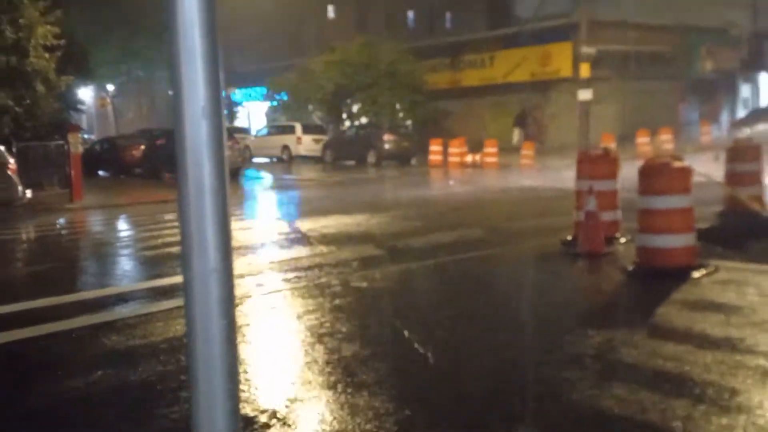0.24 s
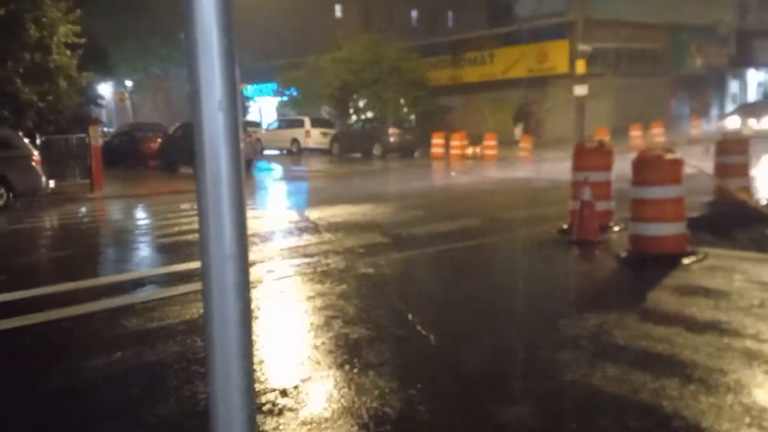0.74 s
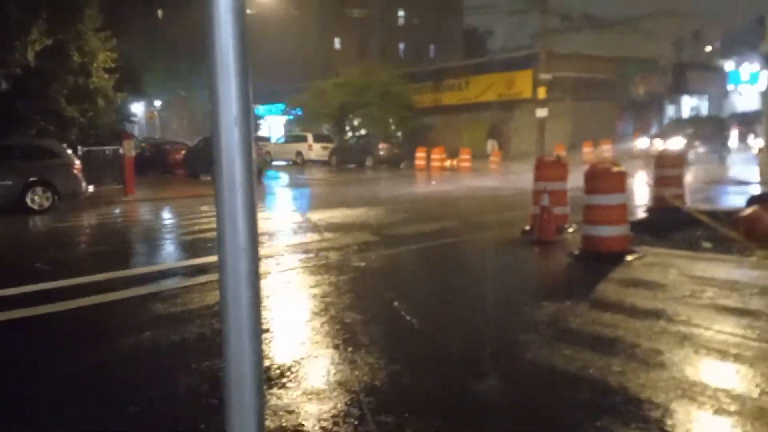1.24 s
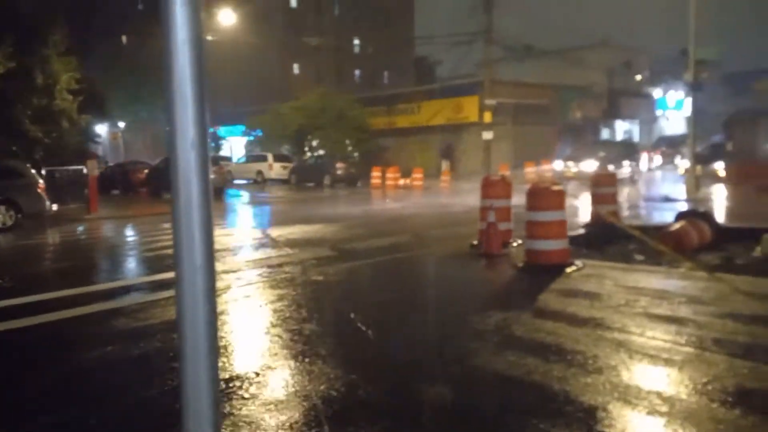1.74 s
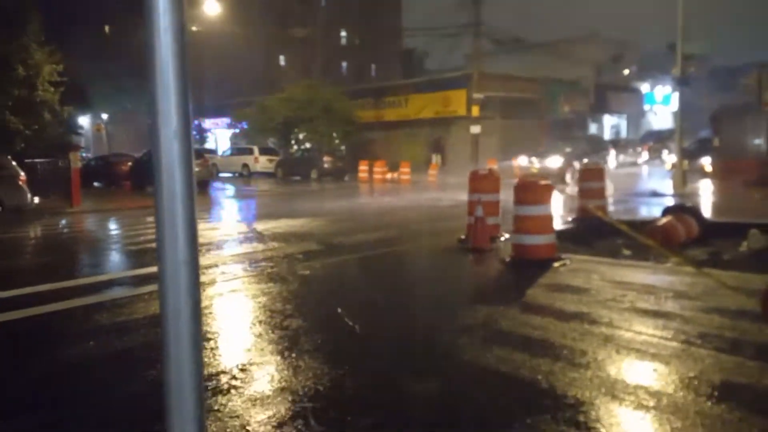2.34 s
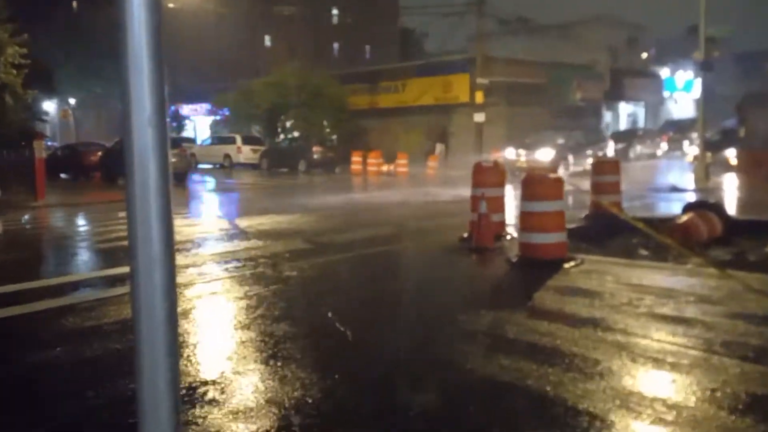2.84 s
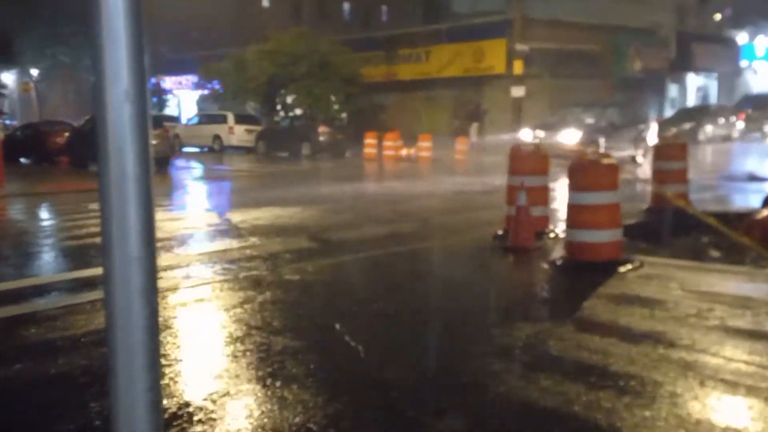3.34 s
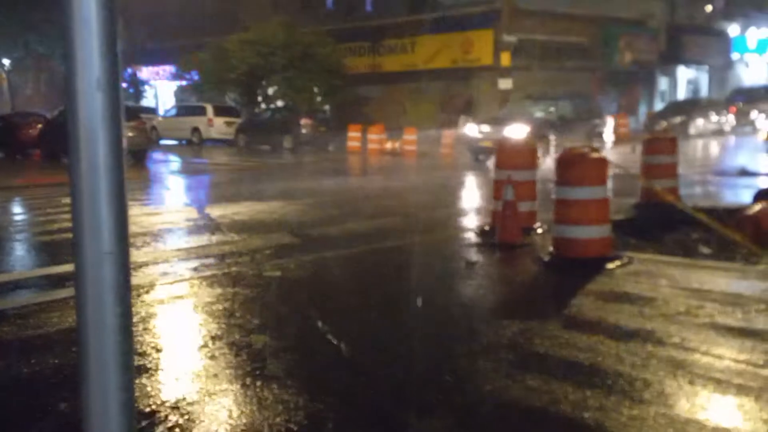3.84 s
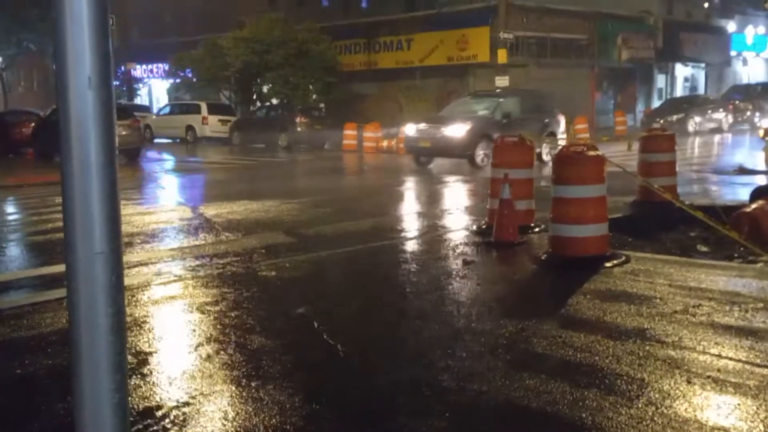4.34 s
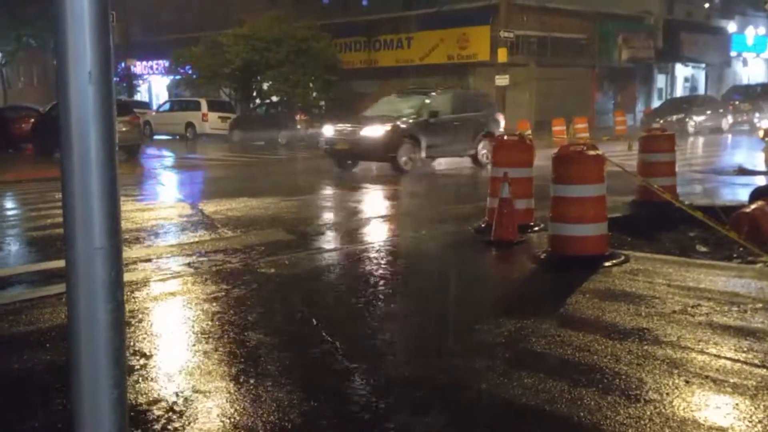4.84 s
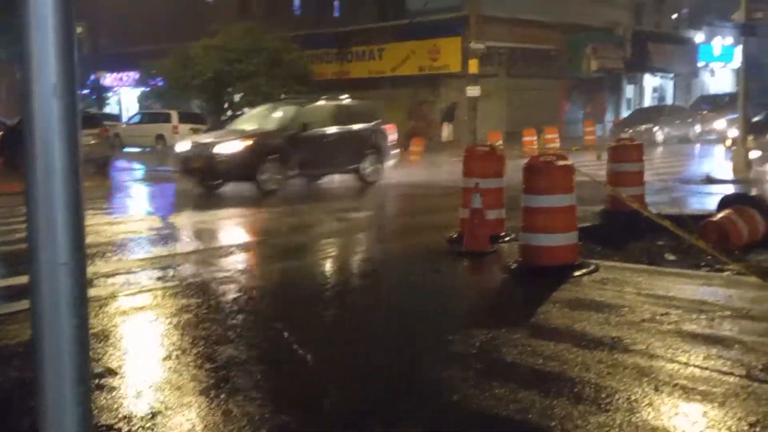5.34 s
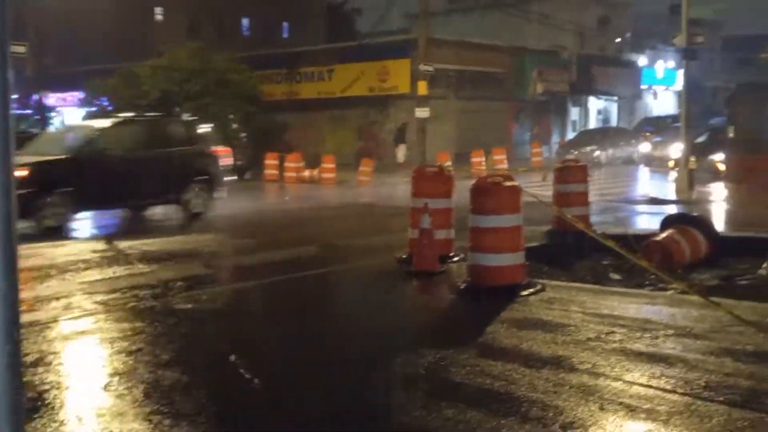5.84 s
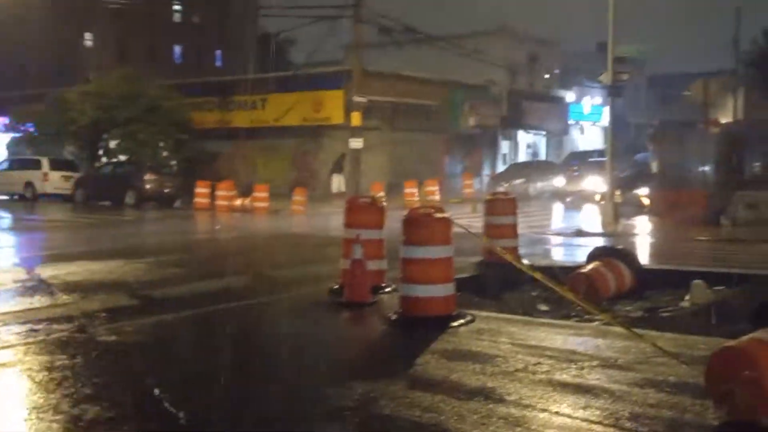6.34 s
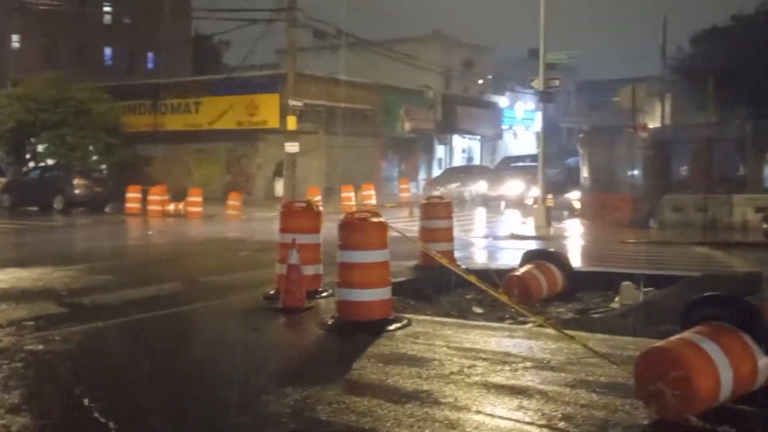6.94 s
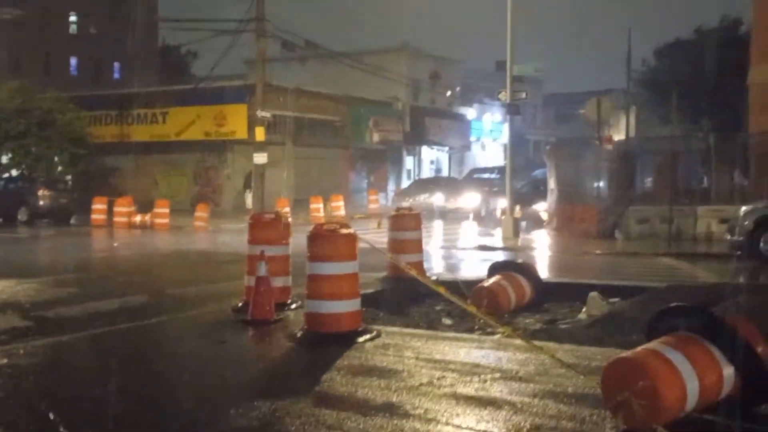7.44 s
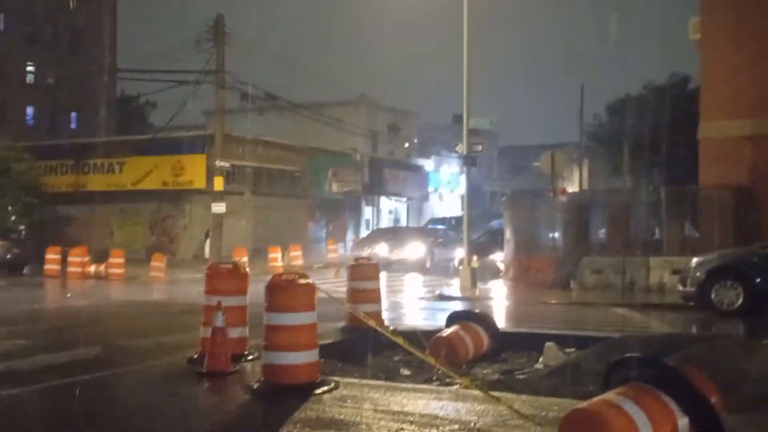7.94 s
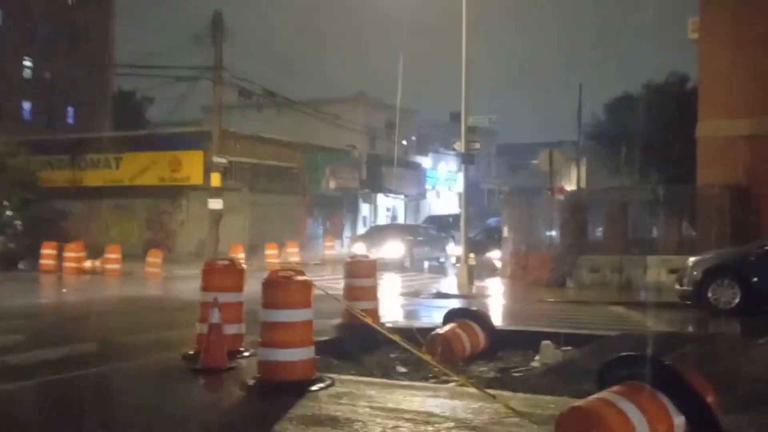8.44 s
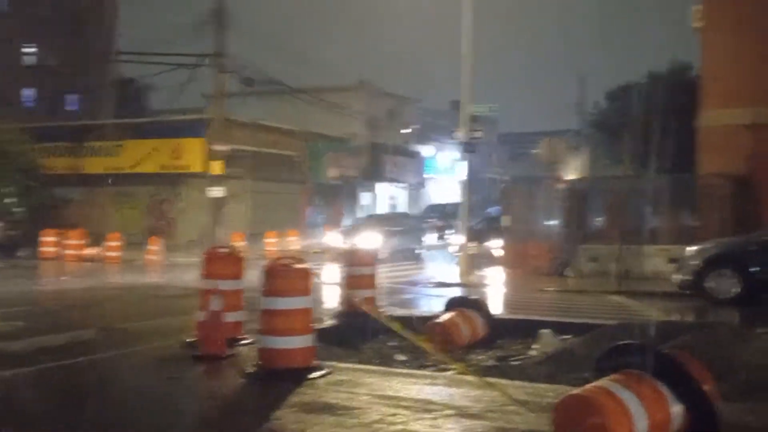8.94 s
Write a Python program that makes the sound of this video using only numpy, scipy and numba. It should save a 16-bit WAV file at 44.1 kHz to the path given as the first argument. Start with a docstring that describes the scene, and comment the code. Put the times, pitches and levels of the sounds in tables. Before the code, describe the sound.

A handheld stereo microphone under cover hears steady heavy rain all around, fine crackling drops and sharp nearby drips. Wind first pushes as a dull bass rumble, then breaks into short fluttering buffets. Far engines drone softly and a faint avenue hiss sits to the right. Midway a car sweeps by with airy road roar and splashing tyres, moving left; its wet hiss swells again near the end, with one last loud drip.

```python
"""Heavy rain on a night street, heard from under a shelter by two microphone ports 19 cm apart.
Far drops are a wash of coloured noise from all round; nearer ones are random crackles at several pitches.
Close drips are millisecond noise splats with smeared echoes off the wall. A car to the side is banded noise:
tyre spray with a moving brighter band, a lower hum and road roar. Wind on the ports is low noise, mostly
separate at each, with buffets, thumps and bass dropouts. Far behind: a noise traffic drone, an avenue's hiss."""
import sys
import numpy as np
from scipy import signal
from scipy.fft import rfft, irfft, next_fast_len
from scipy.io import wavfile
from scipy.ndimage import uniform_filter1d
from numba import njit

SR = 44100
rng = np.random.default_rng(int(sys.argv[2]) if len(sys.argv) > 2 else 0)


def persist_wave(psi):
    """Save psi, clipped to +-1, as 16-bit WAV."""
    counts = np.round(np.clip(psi, -1, 1) * 32767).astype(np.int16)
    wavfile.write(sys.argv[1], SR, np.atleast_2d(counts).T)


N = 405719
PORT_GAP_M, SOUND_M_PER_S = .19, 343


def rain():
    """Countless far drops merge into a wash whose low and high parts swell in sheets; nearer drops stay grainy."""
    # wash over time, before the early colouring: t/s, level/dB
    rain_level = [(0, -33.5), (.6, -34), (1.2, -35), (2.2, -36), (2.6, -35), (2.61, -38.5), (2.9, -37.5),
                  (3.28, -38), (3.7, -37), (4.48, -35), (4.74, -35.5), (5.0, -34.5), (5.59, -34.5),
                  (6.1, -36), (6.9, -33.5), (7.3, -34.5), (8.68, -32.5), (9.2, -34.5)]
    # spectrum of the wash: f/Hz, density/dB per Hz
    rain_colour = [(300, -13), (700, -9), (1500, -1.5), (2500, -0.5), (5000, -3.5), (8000, -5),
                   (16000, -10)]
    # nearer drops landing on different things: f/Hz, rate/drops per s, level against the wash/dB
    patter_bands = [(1580, 60, -18), (2560, 70, -14.5), (3960, 70, -13), (6000, 59, -12), (9200, 50, -11),
                    (14100, 50, -15)]
    # the two sides are coloured differently at first, then abruptly alike: f/Hz, left/dB, right/dB
    early_colour = [(600, 1, 5.5), (1560, 0.5, 2), (2860, -2.5, 4), (3850, 1.5, 4), (4800, 1, 2.5),
                    (6740, -2, 4), (9900, 0.5, 3.5), (14000, -1, 4.5)]
    early_ends_s = 2.603
    wash = unit(colour(all_round(), rain_colour))
    dull = signal.sosfilt(signal.butter(1, 5000, fs=SR, output="sos"), wash)
    bright = wash - dull
    sheets_db = 0.34 * walk(11)  # swells shared by both parts
    wash = dull * undb(sheets_db + 1.15 * walk(15)) + bright * undb(sheets_db + 1.3 * walk(18))
    near = sum(undb(db) * patter(hz, per_s) for hz, per_s, db in patter_bands)
    late = wash + near + undb(-2.0) * wall(near)
    early = np.array([colour(late[0], early_colour, column=1), colour(late[1], early_colour, column=2)])
    shower = np.where(np.arange(N) < early_ends_s * SR, early, late)
    return shower * undb(curves(rain_level)[0])


def patter(hz, per_s, scatter_db=5.0):
    """Drops at random moments and sides, a few much larger; each a short crackle around its pitch."""
    sizes_db = scatter_db * np.minimum(rng.exponential(size=N), 2.4)
    drops = (rng.random(N) < per_s / SR) * undb(sizes_db)
    sides = drops * pan(rng.normal(0, 5.6, N))
    decay_s = 0.0045
    envelope = signal.lfilter([1], [1, -np.exp(-1 / (decay_s * SR))], sides)
    crackle = envelope * rng.standard_normal((2, N))
    band = signal.butter(2, [0.62 * hz, min(1.21 * hz, 20000)], "bandpass", fs=SR, output="sos")
    return unit(signal.sosfilt(band, crackle))


def drips():
    """Each drip: a broad crack of impact, a millisecond splat with a fine fizz; the wall returns all but the fizz."""
    # close drips: t/s, level over 1 ms of the stronger part at the louder port/dB,
    # left minus right/dB, splat f/Hz, fizz minus splat/dB
    drip_hits = [(0.211, -21.5, -2, 5700, 1), (0.479, -18.5, -2, 3270, -13.0), (0.5776, -22, 8.0, 5200, 6),
                 (0.61, -19, 6, 5600, 0), (0.652, -21.5, 6, 5460, -18), (0.695, -23, 1, 5600, -1),
                 (0.8356, -14.5, 4, 3120, -7), (0.847, -23, -9, 3300, -14), (0.876, -17.5, -11, 3950, -4),
                 (0.907, -29, 2, 6000, 7), (0.9434, -33, 7, 5000, -1), (0.996, -22, -7, 7400, -10),
                 (1.1442, -23, 2, 5500, 14), (1.28, -24, 5.0, 5700, -13), (1.6981, -30, -2, 4600, -7.0),
                 (1.877, -20, -5, 5900, 16), (1.9445, -20.5, 3, 4540, -7), (1.9943, -21, 7, 5200, 6),
                 (2.0966, -26, 8.0, 5800, 4.0), (2.186, -22, -4, 4300, -14), (2.325, -27, 0, 6000, 12),
                 (2.3416, -24, 0, 4300, 4), (2.4212, -21.5, -2, 4970, -12), (2.584, -22, 5, 4320, -9),
                 (2.663, -24, 5, 5300, 1), (2.7319, -27, 9.0, 5600, 13), (2.784, -31, 0, 5100, 10),
                 (2.9017, -26, 2, 5100, 10), (3.134, -28, 0, 5500, 10), (3.157, -25, 1, 4800, 17),
                 (3.2556, -27, 8, 5500, -2), (3.3202, -24, -1, 5300, 4), (3.557, -18, 4, 5900, -14.0),
                 (3.8967, -25, 3, 6300, -3), (4.052, -22.5, 3, 5130, -8), (4.3272, -27, 0, 6500, -10),
                 (4.3298, -23.5, 3, 5600, -6), (4.9315, -22, 0, 5200, 2), (4.9385, -22.5, -3, 5200, 6),
                 (4.966, -24, 2, 5000, -5), (5.079, -27, -1, 4900, -2), (5.3206, -22.5, 2, 4630, -14),
                 (5.6433, -18.5, 4, 4360, -14), (5.737, -20, -12, 3400, -10), (6.359, -19, -2, 4400, -14),
                 (6.987, -25, 1, 4200, -17), (7.056, -24, 3, 3950, -13), (7.3634, -25, 0.0, 5200, 12),
                 (7.595, -27, -7, 4000, -14.0), (7.7432, -24.5, 1, 5800, 0), (8.6948, -15.5, -2, 3540, -5),
                 (8.711, -23, 2.0, 4600, -2)]
    crack_db, crack_s = -0.5, .00006  # first instant of contact: level against the splat, decay
    t = np.arange(500) / SR
    fade = np.exp(-t / np.array([[[.001]], [[.0014]]]))  # decay in s: splat, fizz
    direct, splats = np.zeros((2, N + len(t))), np.zeros((2, N + len(t)))
    fizz_band = signal.butter(2, [10500, 16000], "bandpass", fs=SR, output="sos")
    crack_band = signal.butter(1, [1500, 9000], "bandpass", fs=SR, output="sos")
    for s, db, pan_db, hz, fizz_db in drip_hits:
        noise = rng.standard_normal((2, 2, len(t))) * fade
        splat_band = signal.butter(2, [0.6 * hz, min(1.4 * hz, 9000)], "bandpass", fs=SR, output="sos")
        splat = signal.sosfilt(splat_band, noise[0] + 0.18 * noise[0, ::-1])  # a little of the other port
        fizz = signal.sosfilt(fizz_band, noise[1])
        crack = signal.sosfilt(crack_band, np.sign(noise[0]) * np.exp(-t / crack_s))
        splat, fizz, crack = (millisecond_unit(part) for part in (splat, fizz, crack))
        splat = (splat + undb(crack_db) * crack) / np.hypot(1, undb(crack_db))
        gain = undb(db - abs(pan_db) / 2 - max(fizz_db, 0))
        i = int(s * SR)
        direct[:, i:i + len(t)] += gain * pan(pan_db)[:, None] * (splat + undb(fizz_db) * fizz)
        splats[:, i:i + len(t)] += gain * splat
    return direct[:, :N] + wall(splats)


def millisecond_unit(x):
    """Scale each port so that its whole energy equals one millisecond at rms 1."""
    return x / np.sqrt((x ** 2).sum(axis=1, keepdims=True) / (.001 * SR))


def wall(x):
    """Echoes off the wall, each more smeared than the last, stronger on the right."""
    # returns: delay/s, level before the pan/dB, smear decay/s
    wall_returns = [(.0066, -7.5, .0012), (.013, -10.5, .003), (.021, -17, .006)]
    t = np.arange(900) / SR
    echo = np.zeros((2, 2000))
    for delay, db, smear_s in wall_returns:
        smear = rng.standard_normal((2, len(t))) * np.exp(-t / smear_s)
        i = int(delay * SR)
        echo[:, i:i + len(t)] += undb(db) * smear / np.sqrt((smear ** 2).sum(axis=1, keepdims=True))
    return signal.fftconvolve(x, echo * pan(-16.5)[:, None], axes=1)[:, :N]


def car():
    """Wet tyres throw up spray that surges at puddles, and hum; the road roar takes a longer way to the right."""
    # passage: t/s, spray hiss level before surges/dB, roar level/dB, brighter spray band centre f/Hz,
    # port delay as a share of the gap's travel time (negative to the left)
    passage = [(0, -48, -47.5, 2100, 0.69), (4, -72, -54, 2100, 0.49), (5, -49, -45.5, 2100, 0.19),
               (5.3, -48, -48, 2100, -0.65), (5.45, -44.5, -41, 2100, -0.57),
               (5.8, -45, -41.5, 2160, -0.74), (6.05, -45, -45.5, 2210, -0.83),
               (6.35, -44, -41.5, 2220, -0.84), (6.7, -46.5, -46, 2220, -0.99),
               (7.1, -41, -53, 2250, -1.03), (7.25, -43, -58, 1630, -1.06), (7.4, -40, -53, 1600, -1),
               (7.92, -39.5, -45.5, 1750, -0.95), (8.0, -38, -62, 2000, -0.995),
               (8.22, -34.5, -64, 2080, -0.97), (8.5, -34.5, -62, 2140, -1.01),
               (8.8, -38.5, -60, 2160, -0.92), (9.05, -36.5, -56, 2220, -1.01),
               (9.2, -45, -59, 2190, -0.91)]
    # spectrum of the spray: f/Hz, density/dB per Hz
    tyre_colour = [(500, -31), (950, -0.5), (1250, -27), (1600, -9.5), (2500, 0), (4000, -2), (6000, -9),
                   (10000, -26)]
    # wheels hit puddles: t/s, rise of the spray/dB, duration/s
    puddle_hits = [(5.733, 13, 0.044), (5.973, 9, 0.037), (6.594, 9, 0.068), (6.694, 16, 0.091),
                   (7.08, 9, 0.06), (7.596, 11.5, 0.015), (7.997, 6.5, 0.036), (8.712, 1, .06)]
    # spectrum of the roar: f/Hz, density/dB per Hz
    roar_colour = [(350, -28), (550, 7), (760, 6), (950, 4.5), (1400, -19.5)]
    # rising hollow note in the roar: t/s, centre f/Hz
    hollow_note = [(5.4, 740), (6.4, 810), (7.1, 860)]
    # lower band of the tyres as the car draws away: t/s, level/dB, centre f/Hz
    tyre_hum = [(0, -70, 1250), (5, -68, 1250), (5.9, -47, 1280), (6.5, -49, 1280), (7.3, -54, 1220),
                (7.9, -46, 1200), (8.1, -51, 1220), (8.9, -45, 1220), (9.2, -51, 1270)]
    spray_db, roar_db, spray_band_hz, delay_share = curves(passage)
    t = np.arange(N) / SR
    surge_db = sum(db * np.exp(-((t - s) / (lasts / 2)) ** 2) for s, db, lasts in puddle_hits)
    hiss = unit(colour(rng.standard_normal(N), tyre_colour))
    spray_band = undb(1.9 * walk(22)) * moving_band(spray_band_hz * (1 + 0.03 * walk(14)), 420.0)
    spray = undb(surge_db) * hiss + undb(-5.0 + 0.59 * surge_db) * spray_band
    spray = spray * undb(spray_db + 1.0 * walk(11.0))
    hollow = moving_band(curves(hollow_note)[0] * (1 + 0.027 * walk(12)), 240.0)
    road = unit(colour(rng.standard_normal(N), roar_colour))
    roar = unit(road + undb(-4.0) * hollow) * undb(roar_db + 3.7 * walk(14))
    detour = round(0.001307 * SR)  # the right port hears the roar 1.3 ms later
    hum_db, hum_hz = curves(tyre_hum)
    hum = moving_band(hum_hz, 480.0) * undb(hum_db + 1.2 * walk(9.8))
    tyres = ports(spray, delay_share) * pan(-4)[:, None] + ports(hum, delay_share)
    return tyres + np.array([roar, np.roll(roar, detour)])


def moving_band(hz, width_hz):
    """Noise through two equal moving resonances in a row, rms 1."""
    return unit(resonance(resonance(rng.standard_normal(N), hz, width_hz), hz, width_hz))


def wind(shared=0.53):
    """Eddies press on each port mostly on its own: a choppy push and buffets; one side's bass drops out briefly."""
    # rumble of the push before chop: t/s, left level/dB, right level/dB
    wind_level = [(0, -29, -25.5), (1.2, -27.5, -26), (1.6, -27, -24), (2.5, -25.5, -25.5),
                  (2.9, -34.5, -32.5), (3.7, -31, -32), (4.5, -32, -31.5), (6.3, -30.5, -30),
                  (7, -31, -33.5), (9.2, -33.5, -31)]
    # spectrum of the rumble: f/Hz, density/dB per Hz
    wind_colour = [(20, -16.5), (45, -19), (65, -0.5), (85, 1.5), (120, -6.5), (200, -21.5), (400, -45.5)]
    # a dull push turns to brighter gusts: t/s, flutter over rumble/dB
    gust_flutter = [(0, -12), (2.5, -12), (4, -9), (5.5, -6), (7, -7), (9.2, -6.5)]
    # spectrum of the flutter: f/Hz, density/dB per Hz
    flutter_colour = [(70, -25), (130, 1), (200, -3.5), (330, -7.5), (600, -19), (1200, -41)]
    # depth of the random chop: t/s, spread/dB
    chop_depth = [(0, 1), (2.6, 1.5), (4.2, 4.5), (9.2, 5.5)]
    # strong buffets: t/s, peak level/dB, left minus right/dB
    buffet_hits = [(0.743, -25, 5), (0.958, -30.5, -18), (1.211, -26.5, -11), (1.357, -36, 15),
                   (1.686, -23, -4), (2.055, -27, 1), (2.215, -28.5, 18), (2.3, -28, -4), (2.509, -26, 1.0),
                   (2.579, -34, -8), (2.849, -24.5, 1), (3.118, -28, -5), (3.402, -26.5, 0.2),
                   (3.756, -32, 1), (4.176, -28, 3), (4.32, -25, 5), (4.421, -26, 5), (4.575, -22.5, -3),
                   (4.624, -22, 3), (4.868, -22, -2), (4.954, -26, 1), (5.03, -25, 6), (5.073, -26, 0),
                   (5.278, -26, 7), (5.33, -34, -2), (5.468, -34, 8), (5.577, -28, -3), (5.703, -17.5, 3),
                   (5.745, -27, 1), (5.79, -29, -10), (5.956, -33, -5), (6.231, -28, 3), (6.321, -26, -8),
                   (6.371, -26, 3), (6.58, -44, -0.8), (6.934, -29, -2), (7.084, -21.5, -4),
                   (7.323, -26, 3), (7.656, -22, 1), (7.907, -24, 0), (7.992, -33, 11), (8.047, -26, 0),
                   (8.186, -34, -9), (8.261, -27, 5), (8.472, -26, -3), (8.905, -28, 11), (9.099, -24, 2)]
    # buffets are long and dull in the push, short in the gusts: t/s, duration/s,
    # gain on the flutter/dB
    buffet_shape = [(0, 0.06, -14), (2.6, 0.04, -21), (3.2, 0.028, -5.5), (9.2, 0.023, -3.5)]
    # the bass on one side drops out briefly; left list, then right: centre t/s, duration/s
    bass_dropouts = [
        [(3.826, 0.073), (4.785, 0.071), (5.378, 0.019), (6.525, 0.067), (6.785, 0.13), (7.009, 0.056),
         (7.283, 0.038), (7.418, 0.019), (7.513, 0.035), (7.812, 0.037), (8.087, 0.076), (8.855, 0.09),
         (8.935, 0.03), (9.129, 0.045)],
        [(3.298, 0.044), (3.607, 0.023), (4.255, 0.022), (4.694, 0.056), (4.99, 0.062), (5.123, 0.023),
         (5.198, 0.065), (6.869, 0.043), (7.189, 0.048), (7.942, 0.072), (8.137, 0.041), (8.531, 0.051),
         (8.79, 0.046)],
    ]
    dropout_db, dropout_edge_s = -23, 0.0079
    flutter_db, chop_db = curves(gust_flutter)[0], curves(chop_depth)[0]
    lasts_s, share_db = curves(buffet_shape)
    eddies = rng.standard_normal((2, 2, N)) + shared * rng.standard_normal((2, 1, N))
    rumble = unit(colour(eddies[0], wind_colour))
    flutter = undb(flutter_db) * unit(colour(eddies[1], flutter_colour))
    push, shove = rumble + flutter, rumble + undb(share_db) * flutter
    chop = undb(chop_db * np.array([walk(36), walk(36)]))
    steady_chop = chop / uniform_filter1d(chop, SR // 8)  # leaves the slow level alone
    out = push * steady_chop * undb(curves(wind_level))
    t = np.arange(-3000, 3000)  # samples either side of a buffet's peak
    for s, db, pan_db in buffet_hits:
        i = int(s * SR)
        at = np.minimum(i + t, N - 1)
        swell = np.exp(-(t / (lasts_s[i] / 2 * SR)) ** 2)
        puff = shove[:, at] * swell
        level = np.sqrt((swell ** 2).sum() / (puff ** 2).sum(axis=1, keepdims=True))
        out[:, at] += puff * level * undb(db) * pan(pan_db)[:, None]
    gate = np.ones((2, N))
    for port, dropouts in enumerate(bass_dropouts):
        for s, lasts in dropouts:
            gate[port, int((s - lasts / 2) * SR):int((s + lasts / 2) * SR)] = undb(dropout_db)
    return out * uniform_filter1d(gate, int(dropout_edge_s * SR))


def thumps(rise_s=0.0022, fall_s=0.032):
    """Each sharp gust thumps as a brief puff of pressure around its centre, largely common to both ports."""
    # gusts: t/s, level before rise and fall/dB, centre f/Hz, left minus right/dB
    thump_hits = [(0.318, -29, 365, -4), (1.026, -40, 358, 0), (1.628, -38, 278, -12), (4.644, -33, 223, 1),
                  (6.51, -35, 288, -0.5), (7.08, -25.5, 259, -3), (8.044, -29.5, 318, -1),
                  (8.96, -40, 299, 3), (9.089, -30, 288, 4)]
    t = np.arange(4000) / SR
    envelope = np.minimum(t / rise_s, 1) * np.exp(-t / fall_s)
    out = np.zeros((2, N + len(t)))
    for s, db, hz, pan_db in thump_hits:
        noise = rng.standard_normal(len(t)) + 0.65 * rng.standard_normal((2, len(t)))
        band = signal.butter(2, [0.29 * hz, 1.5 * hz], "bandpass", fs=SR, output="sos")
        puff = unit(signal.sosfilt(band, noise))
        i = int(s * SR)
        out[:, i:i + len(t)] += puff * envelope * undb(db) * pan(pan_db)[:, None]
    return out[:, :N]


def drone():
    """Engines further off, from all round and from ahead, and the steady tyre hiss of an avenue on the right."""
    # engines: t/s, level/dB
    drone_level = [(0, -38), (2.4, -43), (4.3, -40), (5.7, -47.5), (7, -43.5), (9.2, -37.5)]
    # spectrum of the engines: f/Hz, density/dB per Hz
    drone_colour = [(100, -32), (200, -4.5), (320, 4), (500, -5.5), (720, -3), (1000, -9.5), (2000, -55)]
    # spectrum of the avenue: f/Hz, density/dB per Hz
    avenue_colour = [(250, -5), (450, 3.5), (750, -5), (1300, 1.5), (2200, -13.5), (4000, -16), (8000, -18)]
    avenue_db, avenue_bearing = -43, 0.69  # level before its wavering, sine of the bearing
    traffic = colour(all_round() + 0.9 * ports(rng.standard_normal(N), 0.3), drone_colour)
    engines = unit(traffic * undb(2.0 * walk(9.7))) * undb(curves(drone_level)[0])
    avenue = unit(colour(rng.standard_normal(N), avenue_colour)) * undb(avenue_db + 0.83 * walk(7.9))
    return engines + ports(avenue, avenue_bearing)


def all_round():
    """Noise from every direction: alike at both ports in the bass, unrelated once the gap exceeds the wavelength."""
    size = next_fast_len(N)
    hz = np.arange(size // 2 + 1) * SR / size
    alike = np.sinc(2 * hz * PORT_GAP_M / SOUND_M_PER_S)
    mid, side = rfft(rng.standard_normal((2, size)))
    mid, side = mid * np.sqrt(1 + alike), side * np.sqrt(1 - alike)
    return unit(irfft(np.array([mid + side, mid - side]), size)[:, :N])


def ports(x, delay_share):
    """Sound reaches the nearer port first, by a share of the gap's travel time (positive: right port first)."""
    lag = delay_share * PORT_GAP_M / SOUND_M_PER_S * SR / 2
    if np.ndim(lag):  # a moving source
        at = np.arange(N)
        return np.array([np.interp(at - lag, at, x), np.interp(at + lag, at, x)])
    return np.array([np.roll(x, round(lag)), np.roll(x, -round(lag))])


def pan(db):
    """Left and right gains for a level difference, left minus right."""
    return undb(np.array([db, -db]) / 2)


@njit
def resonance(x, hz, width):
    """State-variable band-pass whose centre moves; gain 1 at the centre."""
    y, band, low = np.empty(len(x)), 0., 0.
    for i in range(len(x)):
        g, k = np.tan(np.pi * hz[i] / SR), width / hz[i]
        v = (band + g * (x[i] - low)) / (1 + g * (g + k))
        band, low, y[i] = 2 * v - band, low + 2 * g * v, k * v
    return y


def colour(x, table, column=1):
    """Filter by a (f/Hz, gain/dB) shape, interpolated over log frequency."""
    size = next_fast_len(N)
    hz = np.arange(size // 2 + 1) * SR / size + 1  # + 1 keeps the logarithm finite
    table = np.array(table, float)
    shape_db = np.interp(np.log(hz), np.log(table[:, 0]), table[:, column])
    return irfft(rfft(x, size) * undb(shape_db), size)[..., :N]


def walk(rate):
    """Random levels held 1 / rate s and smoothed twice; spread 1."""
    k = int(SR / rate)
    held = np.repeat(rng.standard_normal(N // k + 1), k)
    w = uniform_filter1d(uniform_filter1d(held, k), k)[:N]
    return w / w.std()


def curves(table):
    """Each column of a timed table, sample by sample."""
    s, *columns = np.transpose(table)
    return [np.interp(np.arange(N) / SR, s, c) for c in columns]


def undb(db):
    """Decibels to gain."""
    return 10 ** (np.asarray(db) / 20)


def unit(x):
    """Scale to rms 1."""
    return x / np.sqrt(np.mean(x ** 2))


def scene():
    """All sources at the two ports."""
    return rain() + drips() + car() + wind() + thumps() + drone()


def record(dry):
    """The microphone ports dip near 10 kHz; the recorder cuts the top steeply."""
    # response of the ports: f/Hz, gain/dB
    port_response = [(7900, 0.5), (8500, -2), (9800, -4.5), (11500, 0), (13500, 3.5), (15500, 2)]
    top_hz = 15750
    top_cut = signal.ellip(10, .2, 60, top_hz, fs=SR, output="sos")
    return signal.sosfilt(top_cut, colour(dry, port_response))


dry = scene()
out = record(dry)
persist_wave(out)
```